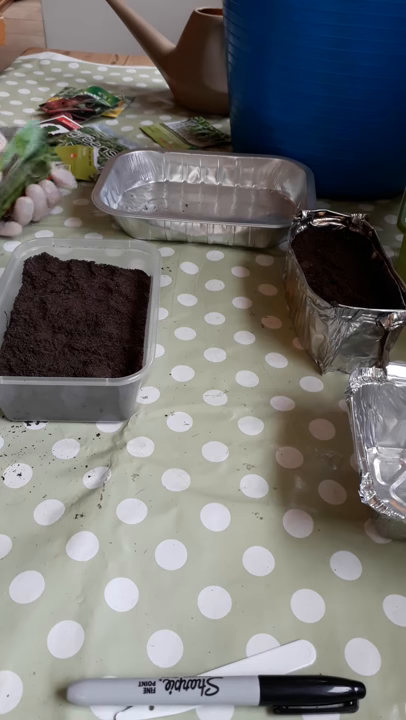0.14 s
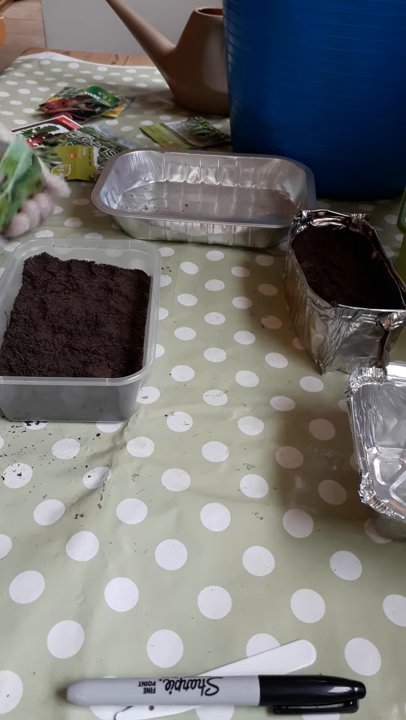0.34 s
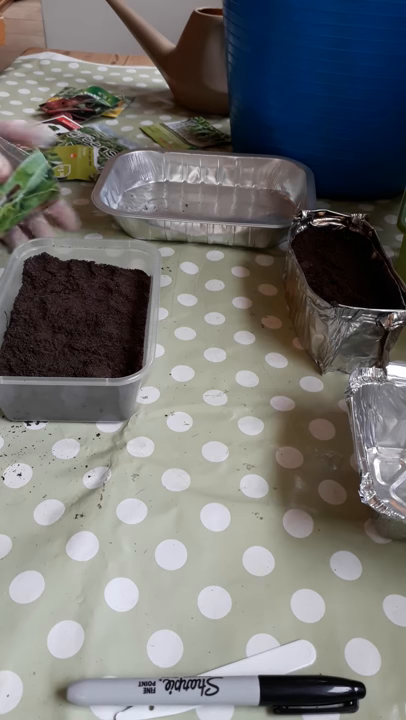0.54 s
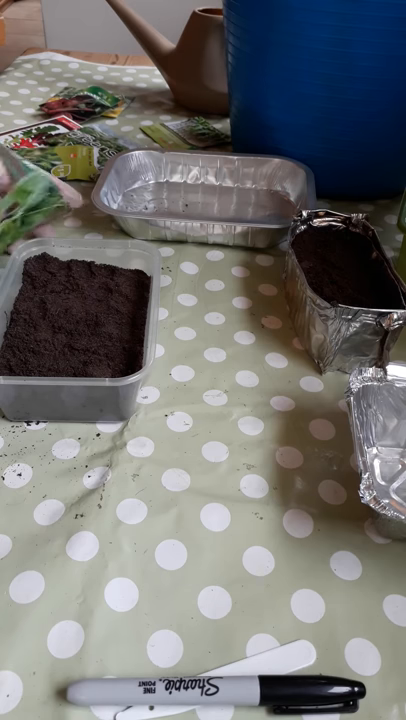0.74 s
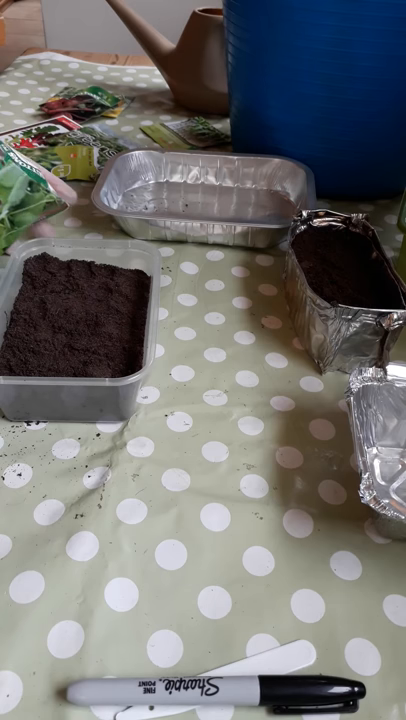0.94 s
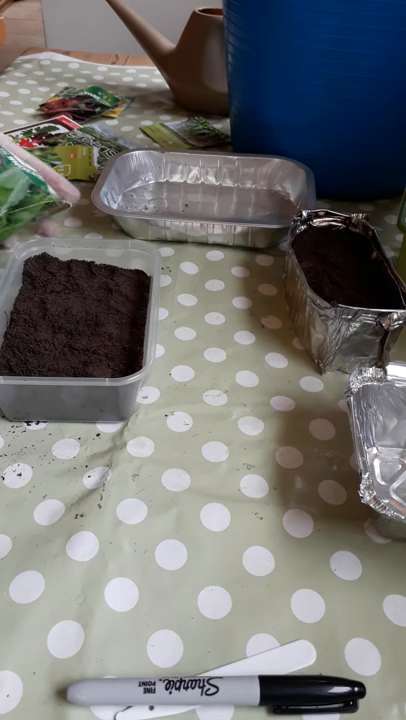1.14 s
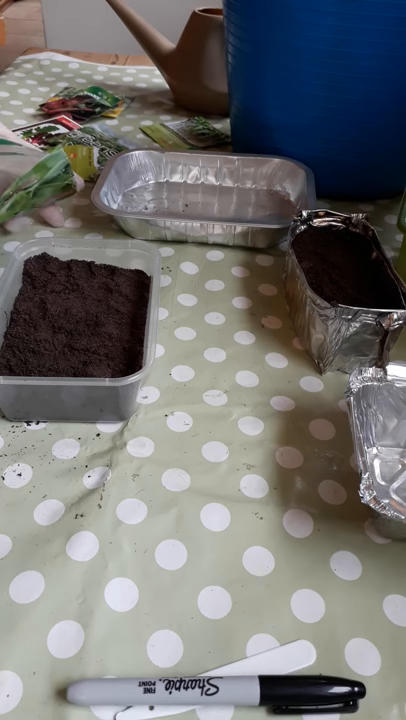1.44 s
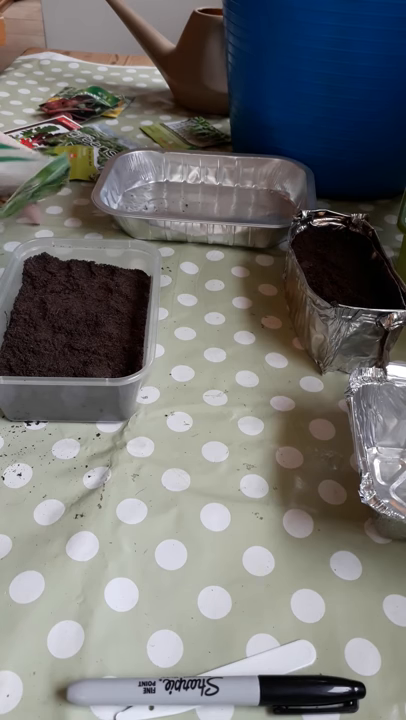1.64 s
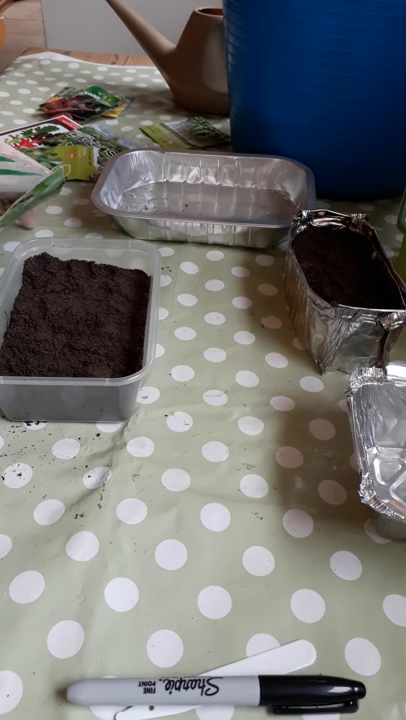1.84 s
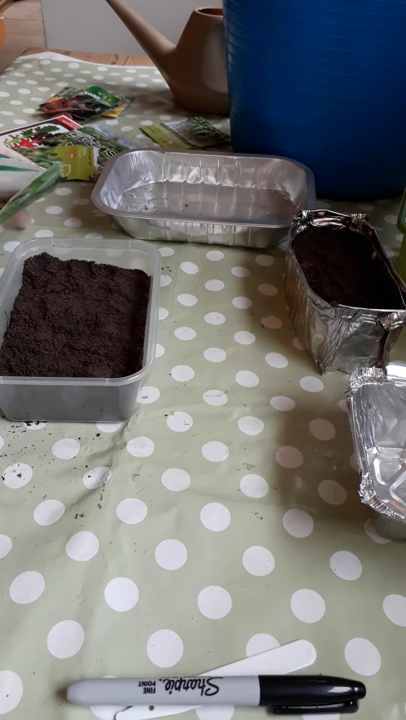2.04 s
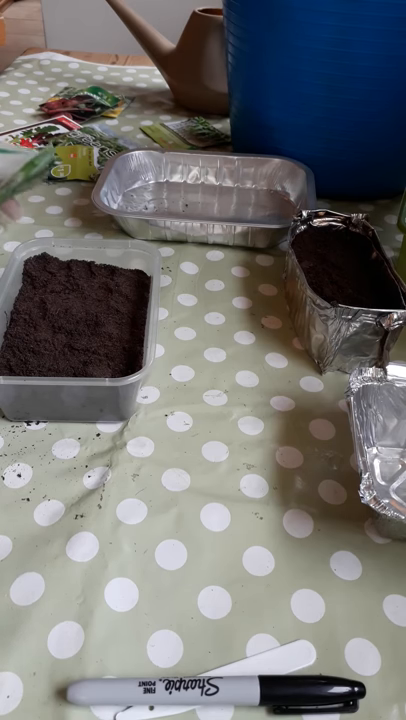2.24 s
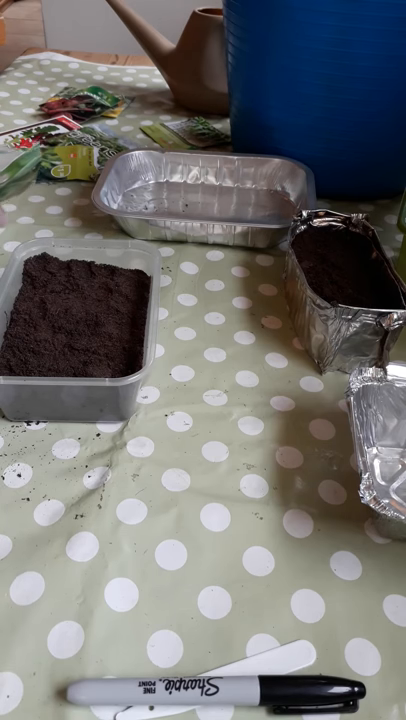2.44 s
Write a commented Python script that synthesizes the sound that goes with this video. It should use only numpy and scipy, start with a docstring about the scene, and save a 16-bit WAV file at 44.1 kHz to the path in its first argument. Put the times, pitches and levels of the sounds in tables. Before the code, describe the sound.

A paper packet rustles in the hand in a small, quiet room. Soft pops lead to a sharp snap with a hollow thump at about 0.3 seconds, then more crinkling around 0.7. Another crisp pop comes at 1 second, followed by light rustles and ticks. After a lull from 1.5 to 2 seconds, the paper slides with a bright hiss near 2.3, ending in faint scrapes by 2.6.

```python
"""Paper slides and crinkles under the fingers as a seed packet is handled over a table.
Stick-slip friction makes the rustle; creases snap through and a stiff edge ticks. The hollow
packet pops softly when pressed, thumps at one hard flick, squeaks where it catches, and its air
rings as the paper slides. The small, quiet room gives each sound a short tail."""
import sys
import numpy as np
from scipy import signal
from scipy.fft import rfft, irfft
from scipy.io import wavfile
from scipy.ndimage import uniform_filter1d, map_coordinates

SR = 44100
rng = np.random.default_rng(int(sys.argv[2]) if len(sys.argv) > 2 else 0)


def output_pcm(signal):
    """Save a mono or channel-first signal as 16-bit PCM at the path in sys.argv[1].

    Samples are clipped to [-1, 1] before scaling.
    """
    pcm = np.clip(np.atleast_2d(signal).T, -1, 1) * 32767
    wavfile.write(sys.argv[1], SR, np.round(pcm).astype(np.int16))


N = 114660
TIME = np.arange(N) / SR
TOP_HZ = 16000
# path of the packet (t/s, lead of the left microphone/ms, left minus right level/dB)
PATH = [(1.95, 0.115, 0.3), (2.05, -0.14, 0), (2.3, -0.15, -2.5)]


def amp(db):
    """Amplitude ratio of a level in decibels."""
    return 10 ** (np.asarray(db) / 20)


def unit(x):
    """Normalisation to an rms of one."""
    return x / np.sqrt(np.mean(x ** 2) + 1e-20)


def read(curve, hz):
    """Interpolation on a logarithmic frequency axis."""
    f, value = np.transpose(curve)
    return np.interp(np.log(hz + 1), np.log(f + 1), value)


def add(mix, start, sound):
    """Superposition: a sound joins the mix at its start time."""
    part = mix[..., max(round(start * SR), 0):][..., :sound.shape[-1]]
    part += sound[..., :part.shape[-1]]


def band(x, lo_hz, hi_hz):
    """Causal band-pass filtering."""
    return signal.sosfilt(signal.butter(3, [lo_hz, hi_hz], "band", fs=SR, output="sos"), x)


def minimum_phase(log_gain):
    """Causal frequency response: the phase follows from the log magnitude."""
    return np.exp(np.conj(signal.hilbert(log_gain)))


def colour(x, curve):
    """Minimum-phase filtering by a curve (f/Hz, gain/dB)."""
    log_gain = np.log(amp(read(curve, abs(np.fft.fftfreq(2048, 1 / SR)))))
    taps = np.fft.ifft(minimum_phase(log_gain)).real
    return signal.oaconvolve(x, taps[None], axes=1)[:, :N]


def whiten(burst):
    """Minimum-phase whitening evens out spectral peaks and keeps the sharp onset."""
    spectrum = np.fft.fft(burst)
    power = uniform_filter1d(abs(spectrum) ** 2, 9, mode="wrap")
    return np.fft.ifft(spectrum / minimum_phase(np.log(power + 1e-12) / 2)).real


def direct(x, t):
    """Path difference: sound from the packet's place at time t reaches one microphone first."""
    times, lead_ms, _ = np.transpose(PATH)
    lag = np.interp(t, times, lead_ms) * SR / 1000
    return np.array([x, map_coordinates(x, [np.arange(len(x)) - lag], order=3)])


def diffuse(count, coherent_hz=660):
    """Diffuse field: noise at two points is alike in the bass and unrelated in the treble."""
    left, other = rfft(rng.standard_normal((2, count)))
    coherence = np.exp(-(np.fft.rfftfreq(count, 1 / SR) / coherent_hz) ** 2 / 2)
    return irfft([left, coherence * left + np.sqrt(1 - coherence ** 2) * other], count)


def blend(x, noise, noise_share):
    """Incoherent addition: unrelated signals sum by power."""
    return np.sqrt(1 - noise_share) * x + np.sqrt(noise_share) * noise


def rubbing(grains_per_s=6100, spread_db=9, flutter_db=1.47):
    """Stick-slip friction: fibres catch and release, giving dense uneven grains over a hiss."""
    # hand movements (t/s, then relative level/dB of the body, crack and treble bands)
    grip = [(0, -52, -54, -50.5), (.11, -61, -60, -54), (.205, -54, -55, -48.5), (.26, -67, -63, -61.5),
            (0.278, -53, -46.5, -51.5), (.32, -45, -56.5, -48.5), (0.335, -42, -38.5, -40),
            (.365, -37.5, -39.5, -43)]
    turn = [(.40, -44, -44.5, -56), (.47, -48.5, -51.5, -52.5), (.56, -58.5, -56, -50),
            (.625, -56.5, -63, -57), (0.637, -61, -45.5, -42), (0.646, -40, -46.5, -47),
            (0.659, -38, -35, -38), (0.681, -41, -42.5, -48), (.72, -52.5, -63, -74)]
    hold = [(0.781, -61.5, -64, -63), (1.02, -62.5, -67, -65)]
    shift = [(1.09, -53, -54.5, -81), (1.17, -61, -59, -53), (1.199, -51.5, -50, -48),
             (1.25, -57.5, -55.5, -51), (1.286, -50, -51, -49.5), (1.337, -51.5, -59.5, -59.5),
             (1.439, -79.5, -77, -57.5), (1.497, -91, -83.5, -66.5)]
    rest = [(1.661, -77.5, -74.5, -59), (1.741, -87.5, -81.5, -78), (1.871, -85, -70, -63.5),
            (2.018, -80.5, -81, -73)]
    lift = [(2.041, -64, -51.5, -44), (2.057, -54.5, -51.5, -48.5), (2.069, -72.5, -73, -55),
            (2.115, -66, -58.5, -54), (2.145, -88, -79, -62.5), (2.175, -45.5, -53, -59)]
    slide = [(2.24, -77, -57.5, -46.5), (2.291, -48, -36, -28), (2.31, -52.5, -44, -32.5),
             (2.328, -66, -62, -60), (2.39, -77, -52, -42.5), (2.453, -51, -49, -46),
             (2.466, -84, -71, -45.5), (2.5, -57, -49.5, -47.5), (2.514, -75, -69, -65),
             (2.526, -64.5, -49.5, -44), (2.565, -90, -97, -78)]
    # limits of the three bands (f/Hz)
    edges = [170, 1500, 5000, 16000]
    # colour of sliding paper (f/Hz, gain/dB)
    timbre = [(170, -1), (300, -6.5), (600, 1), (1700, 2.5), (2800, 7), (4200, 3), (6300, 0), (7700, 5),
              (8600, -2.5), (11000, -0.5), (12500, -5.5)]
    times, *levels = np.transpose(grip + turn + hold + shift + rest + lift + slide)
    flutter = amp(flutter_db * unit(band(rng.standard_normal(N), 8.6, 100)))
    sizes = amp(spread_db * np.minimum(rng.exponential(1, N), 4))
    grains = unit(sizes * rng.choice([-1, 1], N) * (rng.random(N) < grains_per_s / SR))
    friction = blend(grains, rng.standard_normal(N), noise_share=0.85)
    drive = flutter * blend(direct(friction, TIME), diffuse(N), noise_share=0.7)
    rustle = sum(amp(np.interp(TIME, times, db)) * unit(band(drive, lo, hi))
                 for db, lo, hi in zip(levels, edges, edges[1:]))
    return colour(rustle, timbre)


def air():
    """Ambient noise: a steady diffuse field of rumble and hiss."""
    # still air of the room (f/Hz, relative spectral level/dB)
    spectrum = [(60, -1), (95, 4.5), (200, -7), (1000, -18.5), (8000, -11), (16000, -33.5)]
    gain = amp(read(spectrum, np.fft.rfftfreq(N, 1 / SR)))
    return unit(irfft(rfft(diffuse(N)) * gain, N))


def ring(hz, db, t60, rise_s=0.00107):
    """Damped oscillation: one mode starts softly and decays exponentially."""
    t = np.arange(SR // 4) / SR
    envelope = (1 - np.exp(-t / rise_s)) * np.exp(-np.log(1000) * t / t60)
    return amp(db) * envelope * np.cos(2 * np.pi * hz * t)


def pops():
    """Free vibration: the hollow packet rings briefly when a finger presses it."""
    # modes set ringing (t/s, f/Hz, level/dB, T60/s)
    presses = [(.158, 706, -30, 0.042), (.203, 803, -34.5, 0.033), (.2262, 615, -32, 0.031),
               (.280, 637, -38, 0.045), (.844, 590, -43.5, 0.052), (.954, 138, -52.5, 0.037),
               (1.022, 554, -27.5, 0.031), (1.023, 943, -26, 0.016), (1.025, 349, -29.5, 0.027),
               (1.355, 1190, -30, 0.017)]
    out = np.zeros(N)
    for start, hz, db, t60 in presses:
        add(out, start, ring(hz, db, t60))
    return out


def snaps(rise_s=0.000072, fade_s=0.0028, span_s=0.0096):
    """Snap-through buckling: a crease gives way with a sharp front and the paper shakes briefly."""
    # creases (t/s, then relative level/dB of the bass, body, crack and treble bands)
    creases = [(0.2191, -63, -41.5, -49.5, -64), (0.2258, -71, -39, -41, -69), (.294, -60, -43, -43, -49.5),
               (0.2975, -60, -44, -47, -64), (0.3374, -32, -30.5, -28, -33.5),
               (0.3397, -34.5, -30.5, -28, -27), (.358, -42, -32.5, -38.5, -41),
               (.631, -52.5, -50, -46, -47.5), (.843, -59, -49, -59.5, -64),
               (1.0223, -48, -32.5, -31.5, -27.5), (1.1777, -72, -58, -52, -41.5),
               (1.258, -69, -47.5, -52, -58), (1.312, -51, -48, -44.5, -66.5),
               (1.355, -56, -42, -41.5, -55), (2.1584, -59, -51.5, -40.5, -44),
               (2.281, -74, -48.5, -41.5, -35), (2.299, -79, -42, -42.5, -34),
               (2.309, -53, -43.5, -40.5, -38)]
    # limits of the four bands (f/Hz)
    edges = [80, 300, 1500, 3800, 16000]
    # colour of a snap (f/Hz, gain/dB)
    timbre = [(380, -4.5), (560, 0), (1750, 2), (2200, 3.5), (3000, 1.5), (5200, -0.5), (7400, 4.5),
              (8800, -1), (10300, 0.5), (12500, -9)]
    out, t = np.zeros((2, N)), np.arange(2048) / SR
    envelope = (1 - np.exp(-t / rise_s)) * np.exp(-t / fade_s)
    for start, *levels in creases:
        shaking = direct(rng.standard_normal(len(t)), start)
        burst = whiten(envelope * blend(shaking, diffuse(len(t)), noise_share=0.49))
        snap = sum(amp(db) * unit(band(burst, lo, hi)) for db, lo, hi in zip(levels, edges, edges[1:]))
        add(out, start, snap * np.sqrt(span_s / t[-1]))  # energy of those levels held for span_s
    return colour(out, timbre)


def thump(start=0.3378):
    """Impulse excitation: one hard flick sets several modes ringing together."""
    # modes of the thump (f/Hz, level/dB, T60/s)
    modes = [(87.3, -46.5, 0.5), (168.5, -29.5, 0.12), (241.5, -12, 0.026), (350, -22, 0.021),
             (683, -15.5, 0.022), (1327, -15.5, 0.019)]
    out = np.zeros(N)
    add(out, start, sum(ring(*mode) for mode in modes))
    return out


def squeaks(width_hz=560):
    """Narrow-band friction noise: the paper catches for an instant."""
    # catches (t/s, duration/s, f/Hz, level/dB)
    catches = [(0.574, 0.014, 6950, -45), (1.438, 0.024, 3125, -53.5)]
    out = np.zeros(N)
    for start, duration, hz, db in catches:
        noise = unit(band(rng.standard_normal(SR // 4), hz - width_hz / 2, hz + width_hz / 2))
        window = np.hanning(round(duration * SR))
        add(out, start, amp(db) * window * unit(noise[:len(window)]))
    return out


def ticks(low_hz=10600):
    """Transient excitation: a stiff edge flicks past a finger with a puff of the highest treble."""
    # flicks of the edge (t/s, level/dB, decay time constant/s)
    flicks = [(1.177, -37.5, 0.0082), (2.488, -48.5, .02), (2.524, -51, 0.016)]
    out, t = np.zeros((2, N)), np.arange(4096) / SR
    for start, db, fade_s in flicks:
        treble = unit(band(diffuse(len(t)), low_hz, TOP_HZ))
        add(out, start, amp(db) * np.exp(-t / fade_s) * treble)
    return out


def cavity(width_hz=430):
    """Cavity resonance: friction rings the air in the open packet, a noise band of drifting pitch."""
    # course of the resonance (t/s, f/Hz, relative level/dB)
    resonance = [(1.349, 1302, -61), (1.377, 1345, -42.5), (1.47, 1300, -100), (2.03, 1200, -94),
                 (2.05, 1200, -55.5), (2.111, 1230, -55), (2.147, 1274, -88), (2.174, 1351, -57),
                 (2.299, 1300, -37), (2.334, 1287, -61), (2.365, 1220, -43), (2.42, 1100, -53),
                 (2.505, 978, -54.5)]
    times, hz, db = np.transpose(resonance)
    low_pass = signal.butter(3, width_hz / 2, fs=SR, output="sos")
    baseband = signal.sosfilt(low_pass, [1, 1j] @ rng.standard_normal((2, N)))
    phase = 2 * np.pi * np.cumsum(np.interp(TIME, times, hz)) / SR
    envelope = amp(np.interp(TIME, times, db)) * (TIME > times[0]) * (TIME < times[-1])
    return envelope * unit((baseband * np.exp(1j * phase)).real)


def tail(build_s=0.0019):
    """Impulse response of the walls: absorption damps each band at its own rate."""
    # reverberation time (f/Hz, T60/s)
    t60 = [(100, 0.23), (500, 0.29), (1840, 0.4), (4850, 0.2571), (12800, 0.6)]
    count = SR // 2
    hz, t, bands = signal.stft(diffuse(count), SR, nperseg=256)
    decay = np.exp(-np.log(1000) * t / read(t60, hz)[:, None])
    response = signal.istft(bands * decay, SR, nperseg=256)[1][:, :count]
    onset = 1 - np.exp(-(np.arange(count) / SR / build_s) ** 2)
    return unit(response * onset) / np.sqrt(count)


def reflections(x):
    """Reverberation: three crossfaded responses change the reflections as the packet moves."""
    # colour of the reflections (f/Hz, gain/dB)
    timbre = [(80, -6.5), (330, 0), (850, -6), (2000, -0.5), (5000, -0.5), (8000, -6.5)]
    fades = [np.cos(np.pi * (TIME + k / 3)) for k in range(3)]
    walls = sum(signal.fftconvolve(x * fade, tail(), axes=1)[:, :N] for fade in fades)
    return colour(walls / np.sqrt(1.5), timbre)  # the squared fades sum to 1.5


def scene():
    """Superposition of the packet's sounds, panned along its path, their reflections and the air."""
    paper = amp(-0.5) * snaps() + amp(-1.5) * rubbing()
    paper += direct(amp(-5) * cavity() + pops() + thump() + squeaks(), TIME) + ticks()
    times, _, balance_db = np.transpose(PATH)
    paper *= amp(np.outer([0.5, -0.5], np.interp(TIME, times, balance_db)))
    return paper + amp(-0.5) * reflections(paper) + amp(-72) * air()


def record(dry, low_cut_hz=68):
    """Frequency response: two microphones of unequal colour, a low cut and a band limit."""
    # imbalance of the microphones (f/Hz, left minus right level/dB)
    imbalance = [(500, 0.3), (1200, -0.6), (2700, 2.5), (5000, -1.8), (12000, 0)]
    gains = amp(np.outer([0.5, -0.5], read(imbalance, np.fft.rfftfreq(N, 1 / SR))))
    coloured = irfft(rfft(dry) * gains, N)
    thinned = signal.sosfilt(signal.butter(3, low_cut_hz, "high", fs=SR, output="sos"), coloured)
    low_pass = signal.firwin(511, TOP_HZ, window=("kaiser", 9), fs=SR)
    return signal.oaconvolve(thinned, low_pass[None], "same")


dry = scene()
out = record(dry)
output_pcm(out)
```